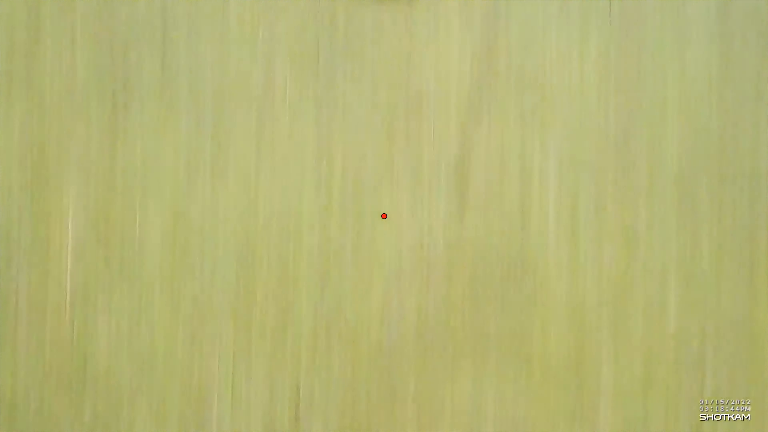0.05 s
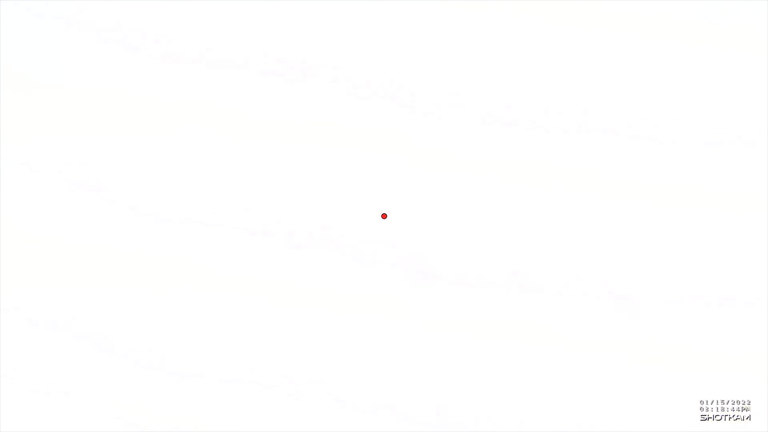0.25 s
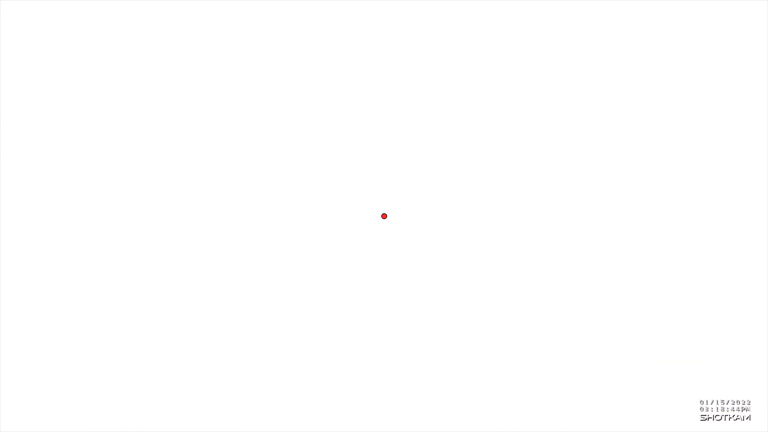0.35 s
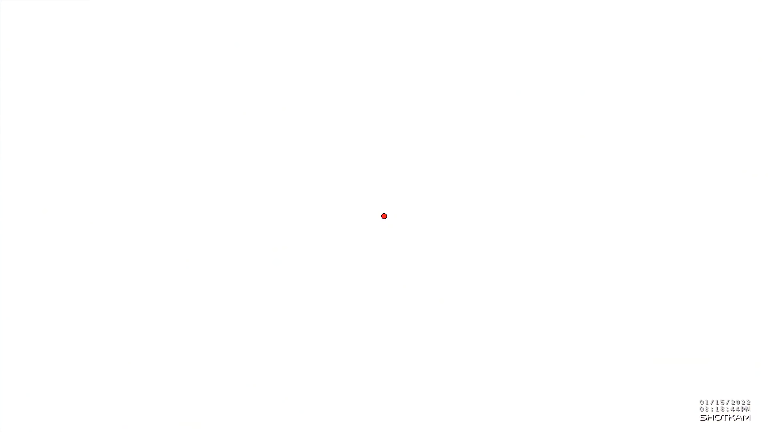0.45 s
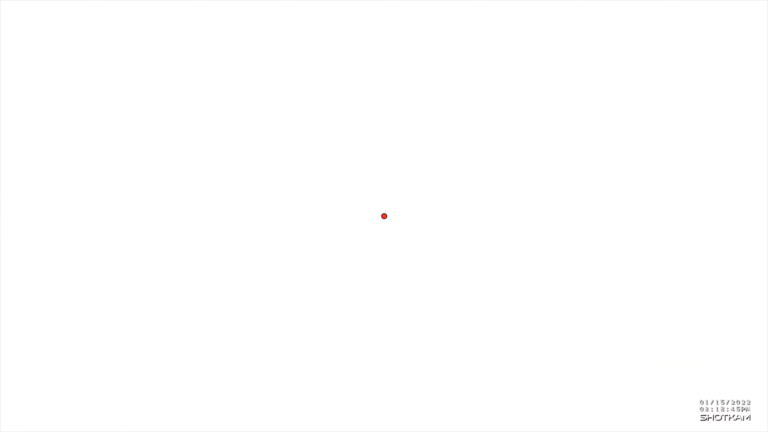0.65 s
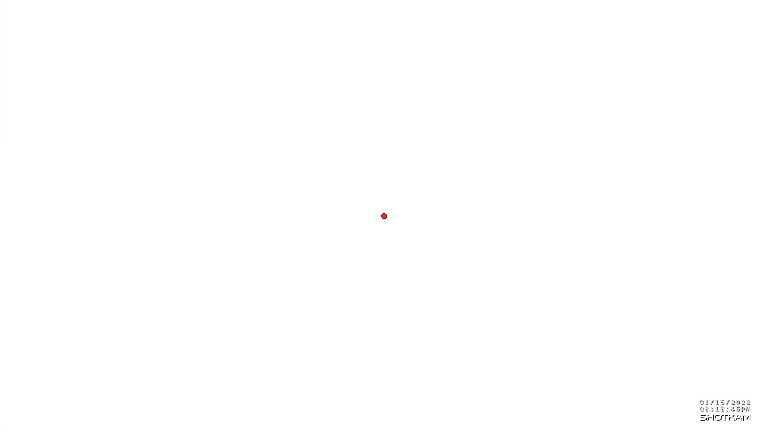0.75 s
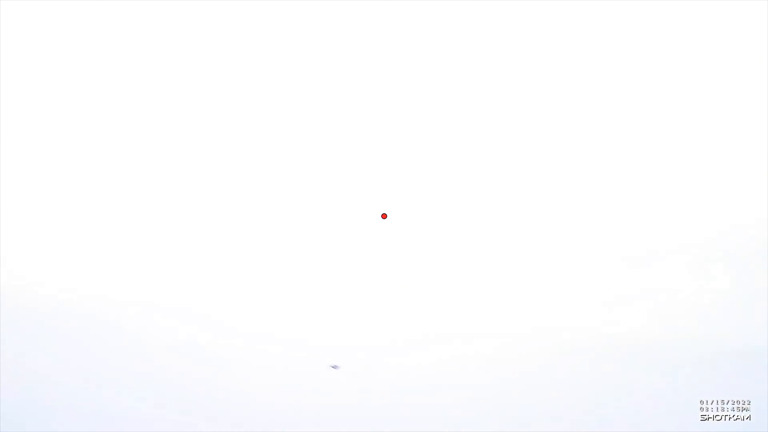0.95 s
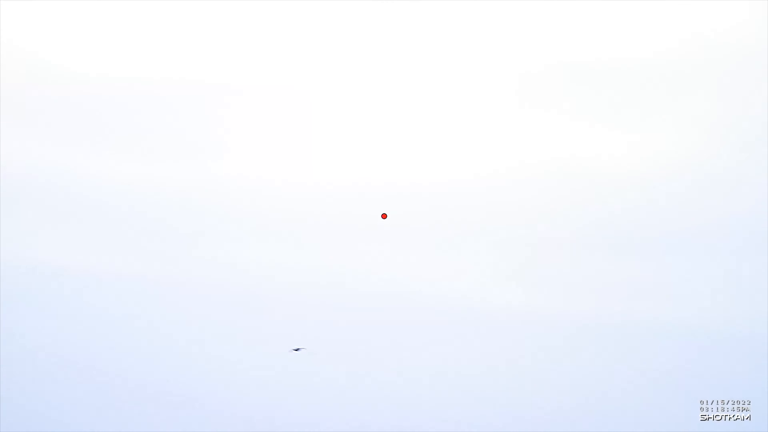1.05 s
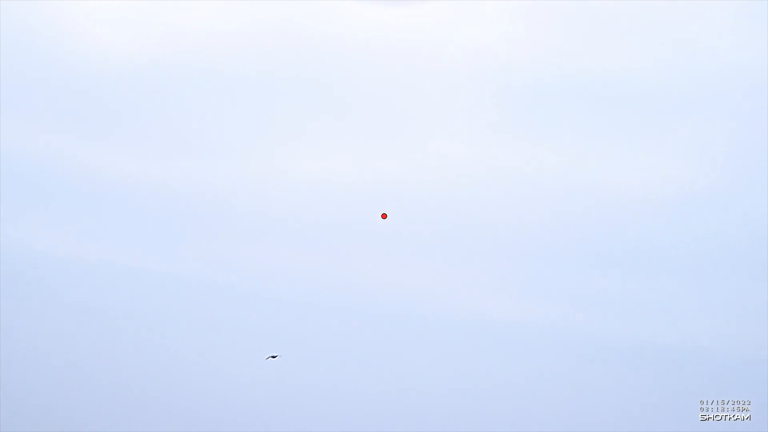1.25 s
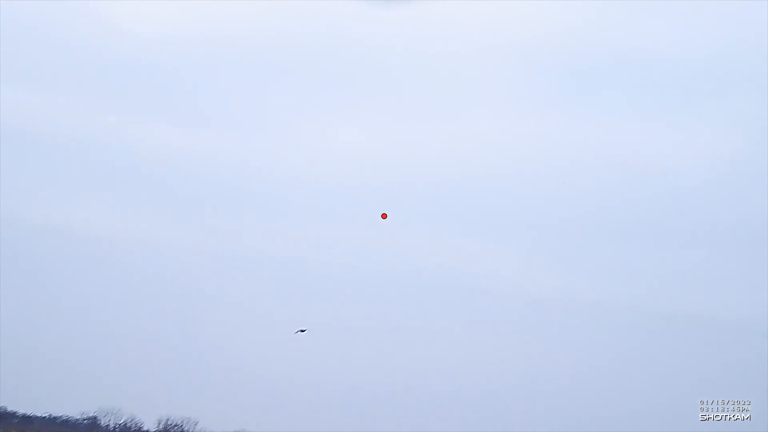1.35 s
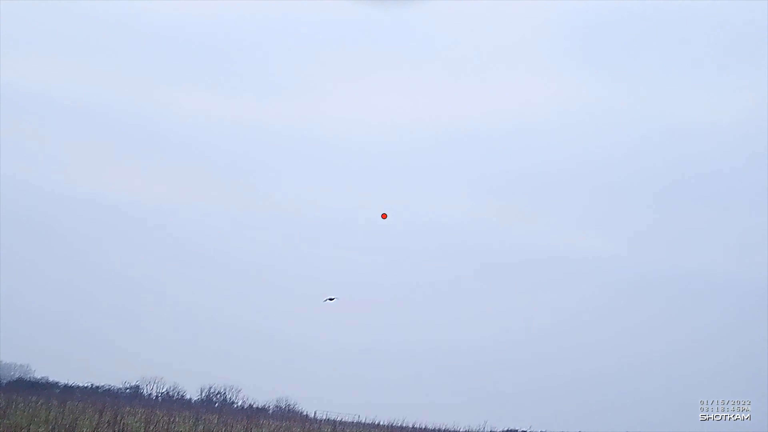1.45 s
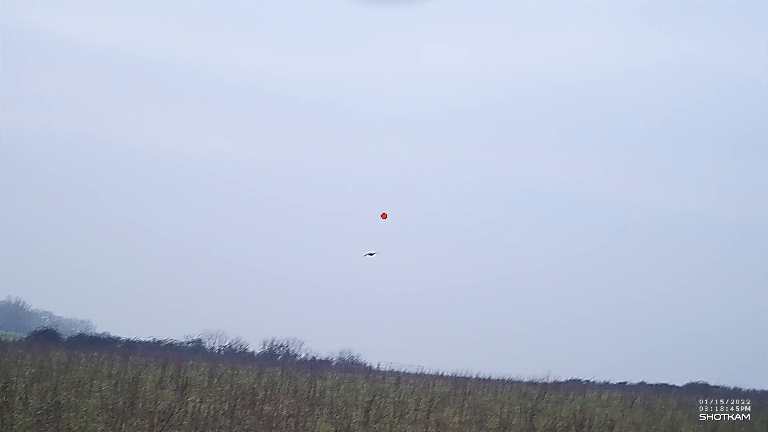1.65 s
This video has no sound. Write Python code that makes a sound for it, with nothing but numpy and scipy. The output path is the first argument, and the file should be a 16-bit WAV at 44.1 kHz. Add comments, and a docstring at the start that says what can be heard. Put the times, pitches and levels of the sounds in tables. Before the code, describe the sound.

One shotgun shot booms, followed by a short metallic clatter of the gun's action.

```python
"""One shotgun shot, heard mostly through the metal by a small microphone clamped to the barrel.
Thumps in the mechanism lead up to a blast that overloads the microphone. The kick sets the barrel
swinging at a low pitch while the action (the moving steel parts) slides and clatters.
Afterwards the gun creaks and ticks in the hands, over a faint rumble and open air."""
import sys
import numpy as np
from scipy import signal
from scipy.fft import rfft, irfft
from scipy.io import wavfile
from scipy.ndimage import uniform_filter1d

SR = 44100
rng = np.random.default_rng(int(sys.argv[2]) if len(sys.argv) > 2 else 0)


def generate_wav(signal):
    """Clip the signal to [-1, 1] and save it as 16-bit WAV at the path in sys.argv[1]."""
    frames = np.transpose(np.atleast_2d(signal))
    scaled = np.clip(frames, -1, 1) * 32767
    pcm = np.round(scaled).astype(np.int16)
    wavfile.write(sys.argv[1], SR, pcm)


N = 74970
T = np.arange(N) / SR

# A mode is a tone that an object rings at; t60 is the time a sound takes to fade by 60 dB.
# Brief overtones that roughen the overloaded blast: f/Hz, relative level/dB, t60/s
BLAST_OVERTONES = [(318, -10, .08), (417, -11, .07), (571, -22, .07)]
# Tone colours of the blast's roar and of its echo: f/Hz, relative level/dB
ROAR_COLOUR = [(20, -9), (60, 5.5), (90, 10), (130, -14.5), (190, 9.5), (270, -14.5), (400, -5.5),
               (700, -15), (1500, -30), (4000, -47.5), (8000, -69.5)]
ECHO_COLOUR = [(20, -29.5), (60, -4), (110, -15.5), (160, -8), (205, 0), (270, -25.5), (400, -23.5),
               (650, -24), (1200, -29.5), (1600, -36), (3200, -38), (8000, -51)]
# Two short low tones under the clatter after the shot: f/Hz, level/dB, t60/s
LOW_BOOM = [(59, -10, .27), (82, -15, .24)]
# Thumps in the mechanism: t/s, bending level/dB, bending f/Hz, upper modes level/dB, rise/s
THUMPS = [(.001, -34, 203.7, -42, .002), (.036, -36, 202, -47, .003), (0.091, -15, 191.3, -23.5, .005),
          (0.167, -15, 199.3, -32, .007), (.236, -14, 185.7, -27.5, .002), (0.82, -43, 160.4, -55, .006)]
# Upper modes of the gun: f/Hz, relative level/dB, t60/s
GUN_MODES = [(588, -9, .13), (638, -6, .11), (953, 0, .09), (1190, -11, .15)]
# Tone colour of buzzing loose parts: f/Hz, relative level/dB
BUZZ_COLOUR = [(40, -1), (200, 10.5), (350, -4.5), (650, -3.5), (1150, -11.5), (1500, -9), (2000, -13.5),
               (2500, -25.5), (3100, -21.5), (4000, -29), (5300, -34), (8000, -43.5)]
# Hard hits of steel on steel: t/s, knock level/dB, steel level/dB
CLACKS = [(.238, -17.5, -8), (0.242, -13, -15.5), (.2735, -10, -4.5), (0.3109, -18.5, -13.5),
          (0.3426, -17, -16.5), (0.3773, -18.5, -20.5), (0.4032, -19, -23.5), (0.4083, -21, -26),
          (0.4406, -20.5, -24), (.460, -27.5, -26.5), (0.473, -22, -27)]
# Light touches of loose parts and hands: t/s, knock level/dB, tick level/dB, chatter time/s
TICKS = [(.2352, -9.5, -8, 0.003), (.258, -45, -18, .003), (0.2634, -25, -23, 0.0032),
         (0.2853, -15.5, -33.5, 0.00052), (0.2993, -15.5, -21, 0.001), (.305, -20, -25.5, 0.0008),
         (.3215, -39, -38, .002), (.332, -38, -22.5, .003), (.339, -16.5, -20.5, .001),
         (0.356, -16.5, -53, .001), (.365, -24, -36, 0.0011), (.3738, -20, -23, 0.00072),
         (.390, -18.5, -24, 0.0036), (.3975, -22, -35, 0.003), (.428, -17.5, -21, 0.0011),
         (0.4325, -21, -17, 0.0042), (0.4982, -25, -35.5, 0.0012), (.517, -37, -32.5, 0.006),
         (0.5276, -29, -36.5, 0.00073), (.541, -60, -43, .002), (0.5543, -47, -51, 0.00087),
         (0.5643, -41.5, -63, 0.0022), (.571, -57, -42, 0.0024), (.599, -48.5, -44.5, 0.007),
         (0.607, -42, -40, 0.0046), (0.6351, -46, -45.5, 0.0058), (0.655, -49, -44.5, 0.006),
         (0.709, -57.5, -63, 0.023), (.729, -57.5, -53.5, .003), (0.76, -51, -55, .004),
         (1.141, -45.5, -64.5, 0.00055), (1.203, -52, -72, 0.013), (1.2216, -33.5, -36.5, 0.0009),
         (1.2342, -43, -54, .0006), (1.2608, -44.5, -60, 0.0061), (1.269, -45, -71, 0.00062),
         (1.283, -55, -54, .003), (1.325, -55, -77, .016), (1.457, -42.5, -63.5, 0.00041),
         (1.4918, -56.5, -47.5, 0.0032), (1.4965, -61, -42.5, 0.0053)]
# Tone colours of a knock on the body, a steel hit and a tick: f/Hz, relative level/dB
KNOCK_COLOUR = [(40, -19), (130, -20), (210, -5), (300, -19.5), (450, -10.5), (650, 2.5), (900, -3),
                (1200, -10.5), (1500, -26.5), (2500, -51.5), (8000, -73.5)]
STEEL_COLOUR = [(100, -26), (900, -1), (1500, -8), (2000, 7), (2500, -6.5), (3100, 10), (3800, 2.5),
                (4500, 8), (5000, -8.5), (6100, -6.5), (7100, -20.5), (9000, -30.5)]
TICK_COLOUR = [(100, -20.5), (900, -4), (1200, 11), (1550, -17), (2000, 4), (2450, -8.5), (3100, 1.5),
               (3800, -4), (4600, -13), (5100, -32.5), (7000, -34), (9000, -31)]
# Modes that ring after a tick: f/Hz, relative level/dB, t60/s
TICK_MODES = [(3080, -26, .035), (3620, -35, .05)]
# Parts sliding in the action: t/s, length/s, starting level/dB, change over the length/dB
SLIDES = [(0, .09, -54, -10), (.1325, .007, -45, 3), (.139, .028, -39, -11), (.1915, .04, -26, -2),
          (.232, .055, -24, -3), (.287, .2, -35, -6)]
# Tone colour of the sliding: f/Hz, relative level/dB
SLIDE_COLOUR = [(100, -9.5), (200, 5), (400, -24.5), (680, 13.5), (950, -6.5), (1200, 4.5), (1550, -7),
                (2100, -8.5), (2500, -7), (3100, -1), (3900, -17), (4500, -11.5), (5100, -15),
                (7000, -36.5), (9000, -58)]
# Creaks of the grip: t/s, length/s, ring level/dB, rasp level/dB, slip rate/Hz, ring f/Hz
CREAKS = [(0.819, 0.056, -61, -69.5, 300, 626), (0.876, .068, -61, -64.5, 410, 870),
          (1.027, 0.036, -52.5, -61.5, 370, 726)]
# Tone colour of a creak's rasp: f/Hz, relative level/dB
RASP_COLOUR = [(100, -36.5), (420, 9.5), (700, 8.5), (950, -5), (1300, 4), (1700, -8.5), (2400, -14),
               (3500, -21.5), (8000, -37)]
# Loudness of the rumble from the hands: t/s, level/dB
RUMBLE_LEVELS = [(0, -67), (.09, -48.5), (.5, -42), (.68, -79), (.75, -57), (.9, -62), (1.05, -72.5),
                 (1.13, -67), (1.2, -59.5), (1.33, -77), (1.45, -63.5), (1.58, -75), (1.7, -80)]
# Tone colours of that rumble and of the open air: f/Hz, relative level/dB
RUMBLE_COLOUR = [(25, -4), (100, -13), (160, -7), (203, 0), (250, -23.5), (400, -39), (1000, -62.5)]
AIR_COLOUR = [(25, 7.5), (60, -2.5), (130, -9.5), (250, -17.5), (600, -16), (1200, -21), (3000, -25),
              (7000, -29.5), (9000, -51.5)]


def blast():
    """The shot bends the gun in one loud, rough burst, with a short roar and a rolling echo."""
    bend_hz, rise_s, hold_s, fall_s, roar_fall_s = 184, .006, .014, .004, .026
    fade = np.exp(-np.maximum(T - hold_s, 0) / fall_s)
    burst = -amp(10) * (np.sin(2 * np.pi * bend_hz * T) + tones(BLAST_OVERTONES)) * fade
    roar = amp(-1) * noise(ROAR_COLOUR) * np.exp(-T / roar_fall_s)
    echo = amp(-26) * noise(ECHO_COLOUR) * decay(t60=.8)
    out = np.zeros(N)
    add(out, np.minimum(T / rise_s, 1) * (burst + roar + echo), at_s=.2062)
    return out


def barrel_swing():
    """The kick swings the barrel, a little faster as it dies away; a short low boom sounds with it."""
    final_hz, sag_hz, settle_s = 34.3, 8.6, .125
    hz = final_hz - sag_hz * np.exp(-T / settle_s)
    swing = amp(-6) * np.sin(2 * np.pi * np.cumsum(hz) / SR) * decay(t60=.85)
    out = np.zeros(N)
    add(out, swing + tones(LOW_BOOM), at_s=.2335)
    return out


def thumps():
    """Each thump shoves the gun, rings its modes and sets loose parts buzzing."""
    out = np.zeros(N)
    for at_s, bend_db, bend_hz, upper_db, rise_s in THUMPS:
        shove = amp(-13.5) * tone(hz=55, t60=.27)
        low = amp(bend_db) * (tone(bend_hz, t60=.14) + shove)
        buzz = amp(-9.5) * noise(BUZZ_COLOUR) * decay(t60=.22)
        upper = amp(upper_db) * (tones(GUN_MODES) + buzz)
        add(out, fade_in(rise_s) * (low + upper), at_s)
    return out


def clatter():
    """Parts knock on the gun's body: hard hits ring the steel and bend the gun, light ones tick."""
    clack_chatter_s = .0018
    knocks, steel, bending = np.zeros((3, N))
    for at_s, knock_db, steel_db in CLACKS:
        push = contact(clack_chatter_s, scatter=1.1)
        add(knocks, amp(knock_db) * push, at_s)
        add(steel, amp(steel_db) * push, at_s)
        bend = amp(-12) * tone(hz=192, t60=.14)
        shove = amp(-1.5) * fade_in(rise_s=.003) * tone(hz=117.2, t60=.044)
        add(bending, amp(knock_db) * (bend + shove), at_s)
    ticks = rattle()
    for at_s, knock_db, tick_db, chatter_s in TICKS:
        push = contact(chatter_s, scatter=.42 * np.sqrt(chatter_s / clack_chatter_s))
        add(knocks, amp(knock_db) * push, at_s)
        add(ticks, amp(tick_db) * push, at_s)
    hits = colour(knocks, KNOCK_COLOUR) + colour(steel, STEEL_COLOUR) + colour(ticks, TICK_COLOUR)
    ring = amp(-15) * strike(steel, tone(hz=4520, t60=.035))
    ring += strike(ticks, tones(TICK_MODES))
    ring += amp(-35) * strike(knocks, tones(GUN_MODES))
    return hits + ring + bending


def contact(chatter_s, scatter):
    """Two parts touch once, then chatter briefly; more scatter means stronger chatter."""
    t = T[:SR // 12]
    fade = np.exp(-t / chatter_s)
    push = scatter * rng.standard_normal(len(t)) * fade / np.linalg.norm(fade)
    push[0] += 1
    return push / np.hypot(1, scatter / 2)


def rattle():
    """Tiny hits come at random while the action moves."""
    hits_per_s, start_s, end_s = 150, .25, .485
    hits = (rng.random(N) < hits_per_s / SR) * (T > start_s) * (T < end_s)
    direction = rng.choice([-1, 1], N)
    level_db = -35.5 + 5.5 * np.minimum(rng.exponential(1, N), 2)
    return hits * direction * amp(level_db)


def slides():
    """Moving parts rub on each other with a gritty hiss."""
    level = np.zeros(N)
    for at_s, length_s, db, change_db in SLIDES:
        t = T[T < length_s]
        add(level, amp(db + change_db * t / length_s) * fade_ends(t, length_s, edge_s=.00075), at_s)
    hiss = rng.standard_normal(N)
    grain_db = 3.5 * np.minimum(rng.exponential(1, N), 5)
    return level * unit(colour(hiss * amp(grain_db), SLIDE_COLOUR))


def creaks():
    """The grip sticks and slips unevenly; every slip rasps and rings a mode of the gun."""
    jitter, ring_width_hz = .11, 43.4
    out = np.zeros(N)
    for at_s, length_s, ring_db, rasp_db, slip_hz, ring_hz in CREAKS:
        t = T[T < length_s]
        wander = unit(uniform_filter1d(rng.standard_normal(N), size=200))[:len(t)]
        slip_count = np.floor(np.cumsum(slip_hz * (1 + jitter * wander)) / SR)
        slips = np.diff(slip_count, prepend=0)  # one click for each slip
        mode = np.sin(2 * np.pi * ring_hz * t) * np.exp(-np.pi * ring_width_hz * t)
        ring = amp(ring_db) * unit(strike(slips, mode))
        strength = rng.exponential(1, N)[:len(t)]
        rasp = amp(rasp_db) * unit(colour(slips * strength, RASP_COLOUR))
        add(out, fade_ends(t, length_s, edge_s=.011) * (ring + rasp), at_s)
    return out


def barrel_tone():
    """One mode of the barrel swells during a creak and sings on."""
    hz, rise_s, t60 = 596, .05, .24
    swell = np.minimum(T / rise_s, 1)
    fade = amp(-60 * np.maximum(T - rise_s, 0) / t60)
    out = np.zeros(N)
    add(out, amp(-48) * swell * fade * np.sin(2 * np.pi * hz * T), at_s=.875)
    return out


def hand_rumble():
    """The moving hands keep the barrel rumbling faintly."""
    times, level_db = np.transpose(RUMBLE_LEVELS)
    return amp(np.interp(T, times, level_db)) * noise(RUMBLE_COLOUR)


def open_air():
    """The air all around is a faint, steady, low rush."""
    return amp(-62.5) * noise(AIR_COLOUR)


def amp(db):
    """Turns decibels into a number to multiply by."""
    return 10 ** (np.asarray(db) / 20)


def unit(x):
    """Scales a sound to an average power of 1."""
    return x / np.sqrt(np.mean(x ** 2) + 1e-20)


def add(mix, sound, at_s):
    """Adds a sound to the mix at the given time."""
    part = mix[max(round(at_s * SR), 0):][:len(sound)]
    part += sound[:len(part)]


def strike(pushes, ring):
    """Every push starts its own copy of the ring."""
    return signal.fftconvolve(pushes, ring)[:len(pushes)]


def colour(x, points):
    """Gives a sound a tone colour; a click of height 1 comes out with a peak of 1."""
    point_hz, point_db = np.transpose(points)
    hz = np.fft.rfftfreq(8192, 1 / SR)
    gain = amp(np.interp(np.log(hz + 1), np.log(point_hz), point_db))
    # Build a filter that rings only after a click, never before it (minimum phase).
    cepstrum = irfft(np.log(gain))
    half = len(cepstrum) // 2
    folded = np.r_[cepstrum[0], 2 * cepstrum[1:half], np.zeros(half)]
    ring = irfft(np.exp(rfft(folded)))[:half]
    return strike(x, ring / abs(ring).max())


def noise(points):
    """Noise with the given tone colour and an average power of 1."""
    return unit(colour(rng.standard_normal(N), points))


def decay(t60):
    """Fades by 60 dB every t60 seconds."""
    return np.exp(-np.log(1000) * T / t60)


def fade_in(rise_s):
    """Rises smoothly from 0 to 1."""
    return np.sin(np.pi / 2 * np.minimum(T / rise_s, 1)) ** 2


def fade_ends(t, length_s, edge_s):
    """Ramps up at the start and down at the end."""
    return np.minimum(np.minimum(t, length_s - t) / edge_s, 1)


def tone(hz, t60):
    """One tone that starts at once and dies away."""
    return np.sin(2 * np.pi * hz * T) * decay(t60)


def tones(table):
    """Several dying tones that start together."""
    return sum(amp(db) * tone(hz, t60) for hz, db, t60 in table)


def scene():
    """All the sounds of the gun over faint open air, in one channel."""
    firing = thumps() + blast() + barrel_swing() + clatter() + slides()
    holding = creaks() + barrel_tone() + hand_rumble()
    return (firing + holding + open_air())[None]


def record(dry):
    """The overloaded microphone flattens the loudest peaks; then the highest treble is cut away."""
    overload, cutoff_hz = .49, 7650
    flattened = np.clip(dry, -overload, overload)
    low_pass = signal.firwin(161, cutoff_hz, window=("kaiser", 7), fs=SR)
    return signal.oaconvolve(flattened, low_pass[None], "same")


dry = scene()
out = record(dry)
generate_wav(out)
```